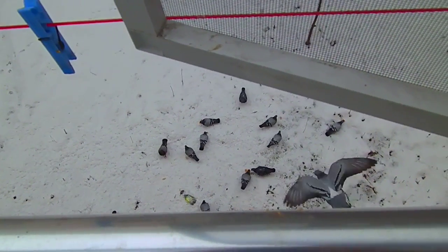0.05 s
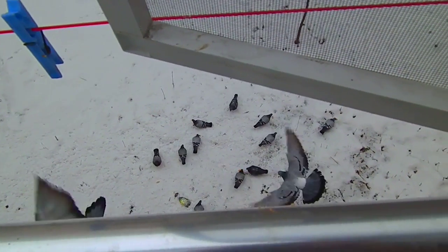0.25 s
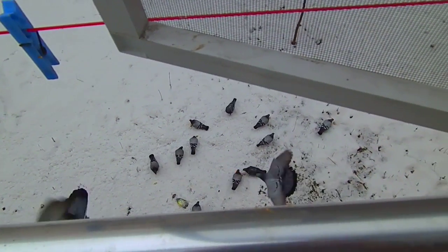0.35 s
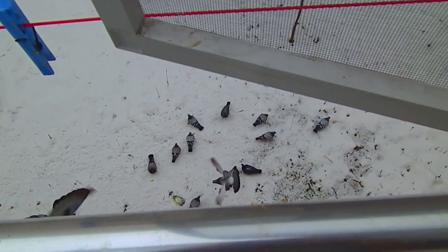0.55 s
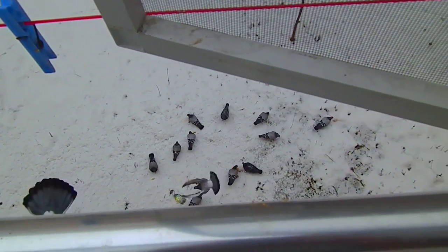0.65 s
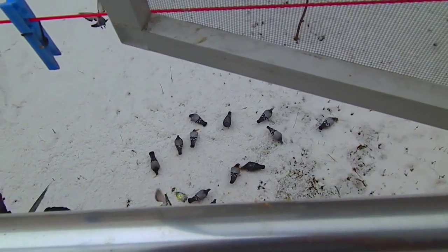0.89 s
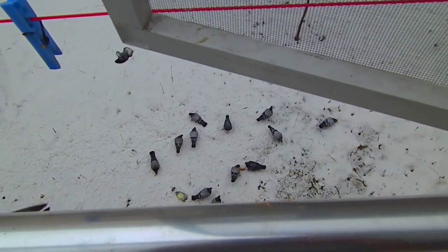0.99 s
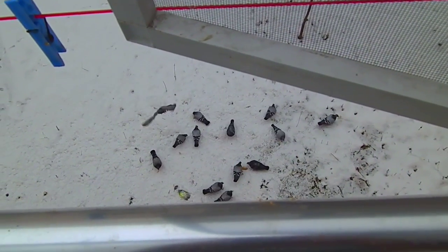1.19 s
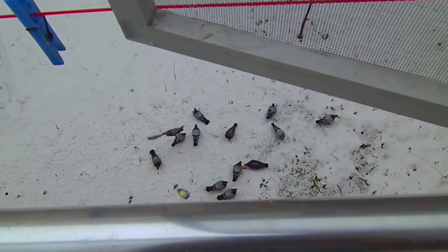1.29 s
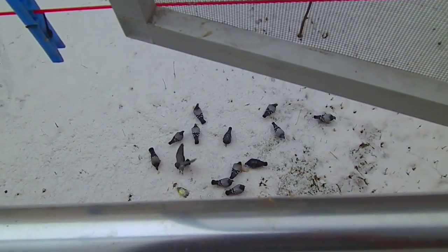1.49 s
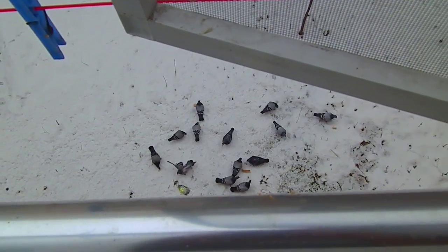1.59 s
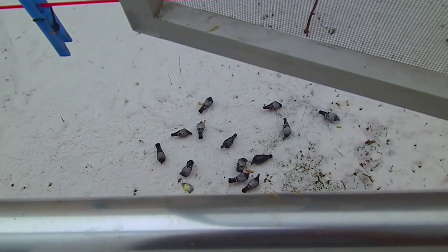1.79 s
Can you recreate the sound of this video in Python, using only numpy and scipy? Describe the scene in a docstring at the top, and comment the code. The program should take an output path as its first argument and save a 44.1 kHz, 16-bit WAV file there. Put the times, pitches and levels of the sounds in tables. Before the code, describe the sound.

A pigeon's wings rustle, then clap sharply four times close by between 0.3 and 0.5 seconds. Fainter claps follow until about 0.8 seconds, giving way to soft wingbeats, feather swishes and tiny ticks as it flies off. A flock flutters softly throughout over a low outdoor rumble and a faint, thin high whine. At about 1.8 seconds a small bird chirps once, far away.

```python
"""A balcony above a snowy yard, with pigeons flying off from just below it.
One bird claps its wings four times close by, expelling trapped air, then more faintly as it drops away.
Its feathers swish by friction and its quills tick. The wingbeats of the flock blur into a soft flutter
over a low outdoor rumble and a thin electronic whine. Near the end a small bird chirps once, far off."""
import sys
import numpy as np
from scipy import signal
from scipy.fft import rfft, irfft
from scipy.io import wavfile
from scipy.ndimage import uniform_filter1d

SR = 44100
rng = np.random.default_rng(int(sys.argv[2]) if len(sys.argv) > 2 else 0)


def pcm_store(signal):
    """Save signal as 16-bit PCM."""
    levels = np.round(np.clip(np.atleast_2d(signal), -1, 1) * 32767)
    wavfile.write(sys.argv[1], SR, levels.astype(np.int16).T)


N = 81585
T = np.arange(N) / SR

# Spectra of the noise sources. Each row: frequency in Hz, relative level in dB.
RUMBLE_SPECTRUM = [(20, -2), (48, 3), (90, -6), (170, -8), (450, -8.5), (1000, -50), (3000, -36),
                   (8000, -47), (16000, -32)]
FLOCK_AIR_SPECTRUM = [(50, 10), (130, 5), (280, 2.5), (500, -1), (660, -5), (850, -4.5), (1300, -14.5),
                      (2500, -26), (6000, -34)]
FLOCK_HISS_SPECTRUM = [(400, -1), (2000, 6), (4500, 1), (8000, 2), (12000, -1), (16000, -5.5)]
PUFF_SPECTRUM = [(40, 3), (90, 7), (170, 8.5), (300, -11), (500, -9), (900, -17), (2000, -17), (6000, -43)]
SWISH_SPECTRUM = [(300, -6.5), (1000, 4.5), (2500, 2), (5000, 5.5), (8500, 9), (12000, 5), (16000, 0.5)]
CRACK_SPECTRUM = [(150, -3), (500, 0.5), (850, 2), (1300, -10.5), (2200, 0.5), (3500, 6), (5200, 0),
                  (8000, 5), (11000, -5), (16000, -1)]
TAIL_SPECTRUM = [(100, 0), (300, 2.5), (500, 1.5), (850, 1.5), (1300, 2.5), (2500, 0.5), (5000, 1.5),
                 (8500, 3.5), (12000, 2.5), (16000, -9)]
# Pitch of the distant call. Each row: time in seconds, frequency in Hz.
CHIRP_GLIDE = [(1.756, 6600), (1.768, 5700), (1.781, 5500)]
# Flutter of the flock. Each row: time in seconds, moving air in dB, feather hiss in dB.
FLOCK_LEVELS = [(0, -46, -57.5), (.06, -67, -49), (.13, -44.5, -51), (.26, -42.5, -43), (.38, -37, -35),
                (.48, -37, -36.5), (0.572, -41, -42), (.73, -39.5, -42.5), (.9, -39.5, -42),
                (1.0, -38.5, -41), (1.12, -36.5, -44.5), (1.25, -41, -44.5), (1.35, -41.5, -46.5),
                (1.46, -42, -48), (1.54, -47, -45.5), (1.65, -52, -51), (1.73, -50, -48.5),
                (1.85, -44.5, -47.5)]
# Soft wingbeats. Each row: centre in seconds, level in dB, spectral peak in Hz.
WING_THUDS = [(.198, -30.5, 138), (0.4533, -15.5, 187), (0.7709, -27, 330), (1.014, -27.5, 107),
              (1.389, -28.5, 197), (1.495, -29.5, 248)]
# Air pushed by downstrokes. Each row: peak time in seconds, half-width in seconds, level in dB.
AIR_PUFFS = [(0.088, .006, -35), (.198, 0.0065, -36), (0.308, 0.011, -27.5), (0.345, 0.0023, -20.5),
             (.418, 0.0078, -31), (.455, 0.0065, -25.5), (.63, 0.013, -30.5), (0.686, 0.0049, -39),
             (0.777, 0.0082, -33), (0.867, 0.0043, -30.5), (0.976, 0.0052, -37), (1.196, 0.021, -34),
             (1.291, 0.018, -35.5), (1.331, 0.0044, -31.5), (1.41, 0.0066, -29.5), (1.497, 0.0053, -30)]
# Reflections from the balcony and the wall. Each row: delay in seconds, gain in dB.
REFLECTIONS = [(.0024, -28), (.008, -27), (0.0128, -17.5)]
# Snapping quills. Each row: start in seconds, level in dB, spectral peak in Hz, decay in seconds.
QUILL_TICKS = [(0.0856, -27.5, 5400, 0.00065), (.1550, -31, 1400, 0.00064), (0.7102, -26.5, 11900, .0012),
               (1.0653, -30.5, 8700, 0.00066), (1.407, -36, 3000, 0.0011), (1.5848, -31.5, 13300, 0.00081),
               (1.7008, -35, 2880, 0.0017)]
# Sliding feathers. Each row: peak time, rise and fall in seconds, level in dB.
FEATHER_SWISHES = [(.016, 0.041, 0.014, -40), (0.099, 0.014, 0.076, -41.5), (.184, 0.013, 0.0085, -38.5),
                   (0.204, .008, .012, -37), (.222, 0.01, 0.0097, -32), (.298, 0.0085, 0.0043, -42),
                   (0.3546, 0.0033, 0.0046, -13), (.468, 0.0063, 0.011, -31), (.517, 0.0089, 0.0075, -31),
                   (0.621, 0.0024, 0.01, -31.5), (.639, 0.0028, 0.0035, -31), (.783, .005, 0.0024, -33),
                   (0.883, 0.0026, .004, -38), (1.197, 0.016, 0.02, -38.5), (1.289, 0.0062, 0.035, -40.5),
                   (1.388, .005, 0.016, -40.5), (1.409, .005, 0.0055, -42.5), (1.498, 0.0047, .01, -45),
                   (1.565, 0.018, 0.01, -44)]
# Modes of the hollow between cupped wings. Each row: frequency in Hz, gain in dB, decay in seconds.
CAVITY_MODES = [(420, -9, 0.0085), (850, -3.5, 0.0062)]
# Wing claps. Each row: start in seconds, crack level in dB, crack length in seconds, treble tilt in
# dB per octave, treble cutoff in Hz, then the levels of air pulse, rustling tail and knock in dB.
WING_CLAPS = [(0.3035, -10.5, 0.0048, 0.5, 16600, -39, -17, -36),
              (.3450, -12, .0008, 0.5, 13900, -0.5, -28, -28.5),
              (0.4092, -5, 0.0017, -1.5, 15400, -17.5, -15.5, -14.5),
              (0.4522, -3, 0.0021, 5.5, 12900, -7.5, -20, -43),
              (.5165, -24.5, 0.0049, -9, 12800, -27, -29.5, -38),
              (0.623, -23, .0015, 0, 10700, -14.5, -27.5, -42),
              (0.7706, -24.5, 0.0024, -2, 13000, -28, -32.5, -37)]

SNAP_ATTACK_S = 0.00047


def from_db(db):
    """Amplitude grows tenfold with every 20 dB."""
    return 10 ** (np.asarray(db) / 20)


def noise(spectrum, tilt_db=0):
    """Spectral shaping gives coloured noise of rms 1, tilted by tilt_db per octave above 500 Hz."""
    hz = np.maximum(np.arange(N + 1) * SR / (2 * N), 1)
    point_hz, point_db = np.transpose(spectrum)
    db = np.interp(np.log(hz), np.log(point_hz), point_db) + tilt_db * np.log2(np.maximum(hz, 500))
    low_cut = hz ** 2 / (hz ** 2 + (point_hz[0] / 2) ** 2)
    x = irfft(rfft(rng.standard_normal(2 * N)) * from_db(db) * low_cut)[:N]
    return x / x.std()


def flicker(rate_hz, depth_db):
    """Random amplitude modulation: low-passed noise makes a gain wander."""
    pole = np.exp(-2 * np.pi * rate_hz / SR)
    slow = signal.lfilter([1], [1, -2 * pole, pole * pole], rng.standard_normal(N + SR))[SR:]
    return from_db(depth_db * slow / slow.std())


def steady(x, samples):
    """Division by the running rms holds the short-term level constant."""
    return x / np.sqrt(uniform_filter1d(x * x, samples) + 1e-12)


def envelope(start, attack, hold, decay):
    """A linear rise, with exponential damping from `hold` seconds after the start."""
    age = T - start
    return np.clip(age / attack, 0, 1) * np.exp(-np.clip((age - hold) / decay, 0, 40))


def pulse(start, width):
    """A critically damped, one-sided pressure pulse of height 1."""
    age = np.clip((T - start) / width, 0, 40)
    return age * np.exp(1 - age)


def cut(x, hz, kind, order):
    """A Butterworth filter attenuates the band beyond its cutoff."""
    return signal.sosfilt(signal.butter(order, hz, kind, fs=SR, output="sos"), x)


def yard_rumble():
    """Low-frequency noise swells and sinks under slow amplitude modulation."""
    return from_db(-48) * noise(RUMBLE_SPECTRUM) * flicker(rate_hz=3.5, depth_db=3.5)


def electronic_whine(hz=15734.4, rms_db=-52):
    """A steady oscillation in the electronics is heard as a pure tone."""
    return from_db(rms_db) * np.sqrt(2) * np.sin(2 * np.pi * hz * T)


def distant_chirp():
    """A small bird's falling note is a glide: phase is the integral of frequency."""
    times, hz = np.transpose(CHIRP_GLIDE)
    swell = np.interp(T, [times[0], (times[0] + times[1]) / 2, times[2]], [0, 1, 0])
    phase = 2 * np.pi * np.cumsum(np.interp(T, times, hz)) / SR
    return from_db(-46) * swell * np.sin(phase)


def flock_flutter():
    """Many distant wings add incoherently into fluttering air and feather hiss."""
    times, air_db, hiss_db = np.transpose(FLOCK_LEVELS)
    air = steady(noise(FLOCK_AIR_SPECTRUM), samples=800) * flicker(rate_hz=45, depth_db=1.5)
    hiss = noise(FLOCK_HISS_SPECTRUM) * flicker(rate_hz=300, depth_db=1.3)
    return from_db(np.interp(T, times, air_db)) * air + from_db(np.interp(T, times, hiss_db)) * hiss


def wing_thuds():
    """A wingbeat pushes the air and sucks it back: one compression, then one rarefaction."""
    out = np.zeros(N)
    for centre, db, hz in WING_THUDS:
        phase = np.clip(2 * np.pi * hz * (T - centre), -10, 10)
        out -= from_db(db) * phase * np.exp((1 - phase ** 2) / 2)
    return out


def air_puffs():
    """Each downstroke displaces air toward the listener, a soft swell of low noise."""
    level = sum(from_db(db) / (1 + ((T - peak) / width) ** 2) for peak, width, db in AIR_PUFFS)
    return level * steady(noise(PUFF_SPECTRUM), samples=400)


def balcony_echoes(x):
    """Reflection adds delayed copies from close surfaces and a short diffuse tail from the yard."""
    early = sum(from_db(db) * np.interp(T - delay, T, x, left=0) for delay, db in REFLECTIONS)
    response = noise(TAIL_SPECTRUM, tilt_db=-5) * envelope(0, attack=0.0058, hold=0, decay=0.068)
    diffuse = signal.fftconvolve(x, response / np.linalg.norm(response))[:N]
    return x + early + from_db(-21) * diffuse


def quill_ticks():
    """Quills snap past each other, each a heavily damped transient in a broad band."""
    out = np.zeros(N)
    for start, db, hz, decay in QUILL_TICKS:
        band = noise([(hz / 4, -20), (hz, 0), (hz * 4, -24)])
        out += from_db(db) * band * envelope(start, SNAP_ATTACK_S, SNAP_ATTACK_S, decay)
    return out


def feather_swishes():
    """Friction between sliding feathers radiates grainy swells of broadband noise."""
    level = np.zeros(N)
    for peak, rise, fall, db in FEATHER_SWISHES:
        from_peak = np.where(T < peak, (peak - T) / rise, (T - peak) / fall)
        level += from_db(db) * np.exp(-np.minimum(from_peak, 20) ** 1.97)
    return level * noise(SWISH_SPECTRUM) * flicker(rate_hz=600, depth_db=0.5)


def cavity_knock(start):
    """Cavity resonance: the air between the cupped wings rings in damped modes."""
    return sum(from_db(db) * np.sin(2 * np.pi * hz * (T - start))
               * envelope(start, SNAP_ATTACK_S, 0, decay) for hz, db, decay in CAVITY_MODES)


def wing_claps(sag_db_per_s=1302, burst_s=0.00014, rebound_s=0.0027):
    """Impact of the wings: trapped air bursts out with a knock, quills crack and vanes rustle apart."""
    out = np.zeros(N)
    rustle = steady(noise(TAIL_SPECTRUM), samples=200) * flicker(rate_hz=560, depth_db=1.5)
    for start, crack_db, length, tilt_db, top_hz, air_db, tail_db, knock_db in WING_CLAPS:
        crack = steady(noise(CRACK_SPECTRUM, tilt_db), samples=40)
        crack *= from_db(crack_db - sag_db_per_s * np.clip(T - start, 0, length))
        crack *= envelope(start, SNAP_ATTACK_S, hold=length, decay=0.0006)
        tail = from_db(tail_db) * rustle * envelope(start, attack=0.0015, hold=length, decay=0.0091)
        feathers = cut(crack + tail, top_hz, "low", order=3)
        # The slow rebound has half the area of the burst.
        air = pulse(start, burst_s) - 0.5 * burst_s / rebound_s * pulse(start, rebound_s)
        out += feathers - from_db(air_db) * air - from_db(knock_db) * cavity_knock(start)
    return out


def scene():
    """Superposition: the close pigeon, the flock and the yard add in one channel."""
    wings = balcony_echoes(wing_claps() + feather_swishes() + quill_ticks())
    pigeon = cut(wings + air_puffs(), hz=87, kind="high", order=1)
    return (pigeon + flock_flutter() + wing_thuds() + distant_chirp() + yard_rumble())[None]


def record(dry, stopband_hz=17500):
    """The electronics add their whine, clip any peak beyond full scale and limit the bandwidth."""
    clipped = np.clip(dry + electronic_whine(), -1, 1)
    return signal.sosfilt(signal.cheby2(16, 60, stopband_hz, fs=SR, output="sos"), clipped)


dry = scene()
out = record(dry)
pcm_store(out)
```